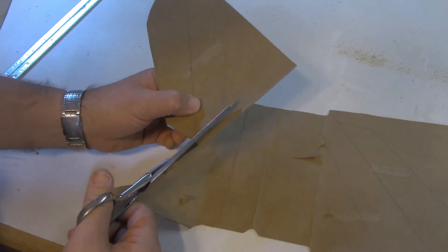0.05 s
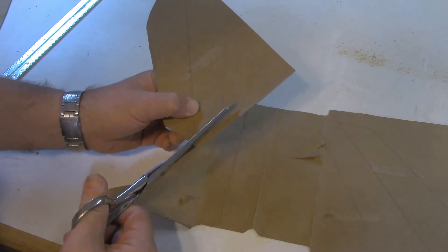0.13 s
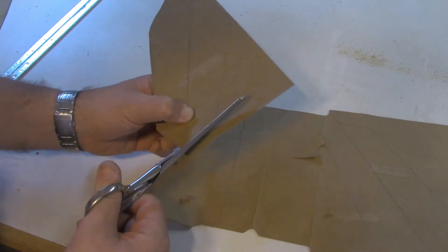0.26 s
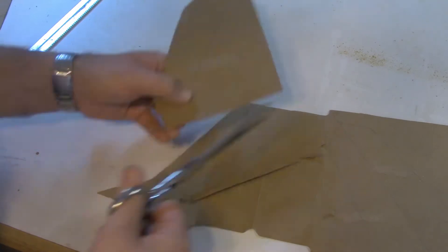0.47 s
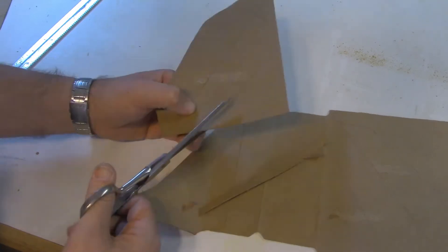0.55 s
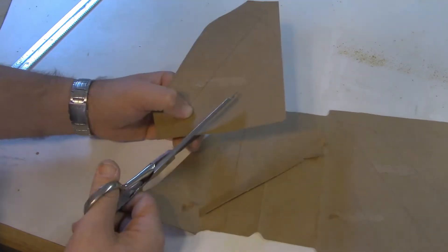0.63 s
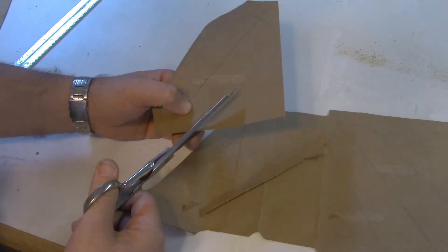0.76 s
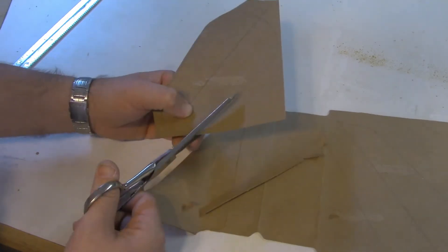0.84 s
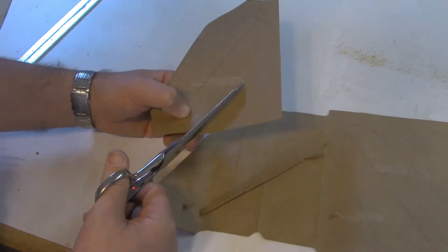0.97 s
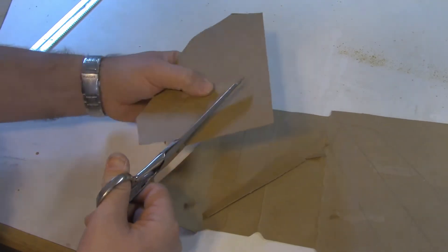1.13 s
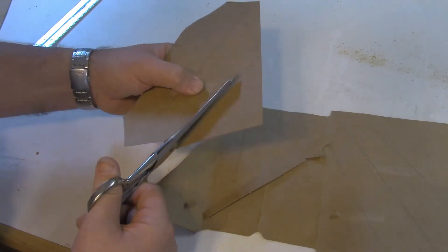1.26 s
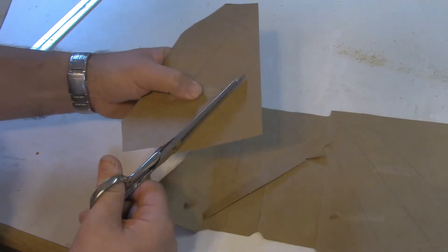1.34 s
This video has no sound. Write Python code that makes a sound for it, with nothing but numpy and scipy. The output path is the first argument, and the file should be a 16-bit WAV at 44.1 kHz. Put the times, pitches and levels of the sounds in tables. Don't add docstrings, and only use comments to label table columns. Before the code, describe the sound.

Scissors cutting thin cardboard, heard close on a small camera microphone. From 0 to 0.2 s the blades crunch and rasp through the card, then snap shut with a sharp, bright clack at about 0.22 s. Near quiet follows until 0.65 s, with faint ticks. Light card crackles lead into a second, softer cut from 1.0 to 1.4 s, gritty and uneven. Steady, quiet room hiss and a short table echo.

```python
import sys
import numpy as np
from scipy import signal
from scipy.fft import rfft, irfft
from scipy.io import wavfile
from scipy.ndimage import uniform_filter1d

SR = 44100
rng = np.random.default_rng(int(sys.argv[2]) if len(sys.argv) > 2 else 0)


def voltage_ratio(level):
    return 10 ** (np.asarray(level, float) / 20)


def master(y):
    cut = np.clip(np.atleast_2d(y).T, -1, 1)
    pcm = np.round(cut * 32767)
    wavfile.write(sys.argv[1], SR, pcm.astype(np.int16))


N = 61739

# pitch_hz, level_db (per Hz)
ROOM_SPECTRUM = [(15, -22), (32, 0.5), (100, -0.5), (240, -5.5), (600, -7), (3200, -17), (9000, -22),
                 (15500, -28.5)]
# middle_s, length_s, level_db, pitch_hz
CHATTER_FIRST_CUT = [(.008, 0.0069, -56, 3100), (.012, .012, -52, 2420), (.014, .005, -50.5, 3950),
                     (.017, 0.0057, -44.5, 2800), (.018, 0.0065, -51, 3510), (.069, .003, -51, 3500),
                     (.0905, 0.0025, -37, 1510), (.141, 0.0053, -55, 2600), (.2385, 0.0017, -35, 4530),
                     (.226, 0.0031, -32.5, 880), (.243, 0.011, -50.5, 404), (.085, 0.0034, -48, 3500),
                     (.088, 0.0032, -35.5, 1470), (.097, 0.006, -42.5, 1260), (.115, 0.0061, -48, 1150),
                     (.162, 0.0061, -44, 5500), (.165, 0.0082, -34, 1150), (.168, 0.0042, -42.5, 4880),
                     (.172, 0.0076, -43, 1020), (.2085, 0.0023, -36.5, 1080), (.218, 0.0026, -33, 1470),
                     (.2285, 0.0044, -28, 1050)]
CHATTER_SECOND_CUT = [(.693, 0.0056, -49.5, 4440), (.694, 0.0043, -50, 5240), (.836, 0.0063, -47, 4160),
                      (.837, .006, -55, 4960), (.837, 0.0075, -48.5, 1054), (1.266, .006, -54.5, 1950),
                      (1.386, 0.013, -55, 980), (1.033, .009, -53.5, 11020), (1.034, 0.0073, -42.5, 867),
                      (1.036, 0.0078, -39, 2650), (1.036, .008, -47.5, 5560), (1.037, .005, -53, 8800),
                      (1.039, 0.0059, -40.5, 1087), (1.050, .007, -44.5, 3440),
                      (1.052, 0.0065, -43.5, 2660), (1.051, 0.0055, -45, 1130), (1.052, .005, -58.5, 11100),
                      (1.135, 0.01, -54.5, 2630), (1.134, 0.0086, -59, 5340), (1.143, 0.0046, -47, 2530),
                      (1.143, 0.0065, -51.5, 11100), (1.143, 0.0059, -56, 9700), (1.145, .004, -39, 1320),
                      (1.149, 0.012, -48, 978), (1.159, 0.0018, -54, 1100), (1.231, 0.0042, -46.5, 2520),
                      (1.231, 0.0036, -42.5, 1670), (1.235, .006, -47.5, 830), (1.242, .004, -48, 1090),
                      (1.258, .003, -49, 1040), (1.2615, 0.0027, -50, 1040)]
# middle_s, length_s, crunch_db, crunch_hz, steel_ring_db
BITES_FIRST_CUT = [(0.012, 0.029, -56, 3160, -67.5), (0.06, 0.029, -51.5, 3230, -59),
                   (0.085, 0.0061, -46.5, 3400, -52), (0.097, 0.016, -46, 2750, -59),
                   (0.117, 0.034, -58, 1990, -67), (0.14, 0.016, -46, 2700, -68),
                   (.165, .011, -49, 2710, -50.5), (0.18, 0.011, -50, 3860, -60),
                   (0.195, 0.029, -53, 3560, -63.5), (0.211, 0.002, -48, 2980, -64),
                   (0.22, 0.008, -32, 4740, -47), (0.229, 0.0054, -38, 2480, -42),
                   (0.238, .014, -40.5, 4380, -55), (0.288, 0.058, -65, 3160, -76),
                   (0.326, 0.006, -58.5, 2050, -82), (0.356, 0.037, -60.5, 3170, -84),
                   (0.467, 0.0046, -57, 2980, -87), (0.481, 0.013, -62.5, 2400, -85)]
BITES_TURNING = [(0.664, 0.013, -64, 2080, -85), (0.677, 0.0077, -56, 4120, -81),
                 (0.693, 0.0098, -47.5, 4690, -64.5), (0.72, 0.018, -58, 2730, -72),
                 (0.733, 0.0079, -58, 4600, -76), (0.765, 0.058, -63.5, 3930, -74),
                 (0.809, 0.0093, -59.5, 4130, -81), (0.837, 0.012, -51.5, 2660, -60.5),
                 (0.851, 0.0052, -52, 4230, -66), (0.88, 0.039, -56, 1930, -71),
                 (0.918, 0.01, -56, 3040, -71), (0.944, 0.048, -62.5, 1850, -74)]
BITES_SECOND_CUT = [(1.015, 0.0068, -53.5, 4200, -76), (1.033, 0.012, -45, 3480, -54),
                    (1.05, 0.0085, -47.5, 3300, -55.5), (1.088, 0.033, -54.5, 3100, -77),
                    (1.133, 0.0076, -61, 2620, -63), (1.143, 0.0069, -51.5, 3580, -59),
                    (1.189, 0.04, -54.5, 3450, -71), (1.231, 0.0089, -48, 3470, -63.5),
                    (1.243, 0.0046, -56, 2460, -77), (1.259, 0.0086, -57, 1930, -67),
                    (1.274, 0.025, -60, 2740, -80), (1.303, 0.021, -48, 4770, -65),
                    (1.314, 0.016, -50.5, 5300, -78), (1.364, 0.0091, -61.5, 2250, -81),
                    (1.382, 0.023, -56, 1870, -77), (1.394, 0.0049, -45, 3660, -58.5)]
# pitch_hz, level_db, t60_s
BLADE_LOW_MODES = [(2050, 2, 0.018), (2600, 2.5, 0.059), (3120, -5, 0.0064), (4300, -12, 0.011),
                   (4700, 16, 0.007), (5560, 6, 0.035)]
BLADE_HIGH_MODES = [(8870, -8, 0.0063), (9770, 5, 0.011), (10980, 0, 0.01)]
# middle_s, length_s, level_db, resonance_hz
FLEX_FIRST_CUT = [(0.015, 0.014, -56, 1550), (0.056, 0.036, -54.5, 1404), (0.089, 0.014, -42, 1235),
                  (0.098, 0.011, -44.5, 1480), (0.107, 0.012, -54, 1120), (0.138, 0.024, -53, 1530),
                  (0.165, .012, -41, 1164), (0.176, .012, -56, 1150), (0.202, 0.023, -50.5, 683),
                  (0.2088, 0.0043, -42, 1020), (0.217, 0.0049, -33.5, 1545), (0.225, 0.01, -34.5, 937),
                  (0.242, 0.011, -55.5, 1110)]
FLEX_SECOND_CUT = [(0.663, 0.025, -64, 430), (0.677, 0.006, -75, 1260), (0.693, 0.0082, -58, 1090),
                   (0.722, 0.013, -66, 990), (0.734, 0.005, -56, 1230), (0.762, 0.038, -63, 1430),
                   (0.81, 0.0093, -71, 1820), (0.837, 0.012, -51, 1400), (0.85, 0.005, -61, 1050),
                   (0.881, 0.017, -55, 1440), (0.916, 0.0052, -49.5, 620), (0.945, 0.061, -60, 470),
                   (1.015, 0.0051, -49.5, 674), (1.034, 0.016, -48.5, 1750), (1.05, 0.01, -50, 1150),
                   (1.088, 0.03, -55, 1300), (1.134, 0.0067, -69, 1100), (1.146, 0.013, -48.5, 1285),
                   (1.189, 0.021, -59, 1270), (1.231, 0.0066, -52, 1400), (1.244, 0.006, -57, 1070),
                   (1.262, 0.0082, -51.5, 1060), (1.274, 0.01, -52.5, 970), (1.3, 0.034, -52, 1096),
                   (1.311, 0.012, -52, 1500), (1.365, 0.0091, -69, 890), (1.38, 0.021, -55.5, 1020),
                   (1.394, 0.0045, -53.5, 950)]
# pitch_hz, level_db, t60_s
CARD_PANEL_MODES = [(970, 0, 0.049), (1150, 2, 0.031), (1358, 18, 0.022), (1630, 1, 0.021)]
# pitch_hz, level_db, t60_s
SNAP_MODES = [(276, -32, 0.014), (501, -25, 0.029), (930, -23, 0.021), (2190, 3.5, 0.0073),
              (2935, -18.5, 0.019), (3445, -13.5, 0.012), (4130, -5.5, 0.0043), (5500, 0.5, 0.0075),
              (6580, -16, 0.0086), (8150, -10.5, 0.0054), (10150, 1.5, 0.0051), (11260, -2, 0.0055),
              (12700, -10, 0.0036), (14900, -9, 0.003)]

CLOSE_TOP_HZ = 15700


def unit(x):
    return x / np.sqrt(np.sum(x ** 2) + 1e-18)


def low_cut(x, hz, order=2):
    return signal.sosfilt(signal.butter(order, hz, "high", fs=SR, output="sos"), x)


def ring(modes, rise_s, size=2048):
    t = np.arange(size) / SR
    total = np.zeros(size)
    for k, (hz, db, t60_s) in enumerate(modes):
        decay = np.exp(-np.log(1000) * t / t60_s)
        total += (-1) ** k * voltage_ratio(db) * np.sin(2 * np.pi * hz * t) * decay
    return unit(total * (1 - np.exp(-t / rise_s)))


def fibres():
    fibres_per_s, spread_db = 14000, 2.5
    chance, size_draw, sign_draw = rng.random((3, N))
    size = voltage_ratio(-spread_db * np.log(1 - size_draw)) * np.sign(sign_draw - 0.5)
    silence = np.exp(np.clip((chance * SR / fibres_per_s - 1) * 20, -50, 50))
    return size / (1 + silence)


def add_burst(out, stream, middle_s, length_s, db, body):
    t = np.arange(N) / SR - middle_s - 0.018 * length_s
    width_s = length_s * np.where(t < 0, 0.36, 0.43 * 0.7)
    swell = np.exp(-0.5 * (t / width_s) ** 2)
    i = np.flatnonzero(swell > 1e-3)
    start, stop = i[0], i[-1] + 1
    burst = signal.fftconvolve((stream * swell)[start:stop], body)[:N - start]
    out[start:start + len(burst)] += unit(burst) * voltage_ratio(db) * np.sqrt(0.91 * length_s * SR)


def room():
    room_db, hiss_top_hz = -58.5, 15600
    whine_hz, whine_db = 12000, -85
    hz = np.fft.rfftfreq(N, 1 / SR) + 1
    curve_hz, curve_db = np.array(ROOM_SPECTRUM).T
    shape = voltage_ratio(np.interp(np.log(hz), np.log(curve_hz), curve_db))
    hiss = irfft(rfft(rng.standard_normal(N)) * shape * (hz < hiss_top_hz), N)
    whine = np.sqrt(2) * voltage_ratio(whine_db) * np.sin(2 * np.pi * whine_hz * np.arange(N) / SR)
    return unit(hiss) * np.sqrt(N) * voltage_ratio(room_db) + whine


def chatter():
    roughness, grip_s = 0.48, 0.0012
    t, out = np.arange(N) / SR, np.zeros(N)
    waver = uniform_filter1d(rng.standard_normal((2, N)), size=int(grip_s * SR) + 1, axis=1)
    grip = 1 + roughness * (waver[0] + 1j * waver[1]) / np.std(waver)
    for k, (middle_s, length_s, db, hz) in enumerate(CHATTER_FIRST_CUT + CHATTER_SECOND_CUT):
        i = np.flatnonzero(np.abs(t - middle_s) < 2 * length_s)
        since = t[i] - middle_s
        swell = np.exp(-0.5 * (since / (0.37 * length_s)) ** 2)
        burst = swell * np.imag(grip[i - 300 * k] * np.exp(2j * np.pi * hz * since))
        out[i] += voltage_ratio(db) * unit(burst) * np.sqrt(np.sum(swell ** 2))
    return out


def blades():
    rise_s, crunch_t60_s = 0.00017, 0.0056
    out, crunch_stream, steel_stream = np.zeros(N), fibres(), fibres()
    rasp_mid = voltage_ratio(6) * ring([(3430, 0, 0.00066)], rise_s)
    rasp_high = voltage_ratio(5) * ring([(9560, 0, 0.0007)], 1 / SR)
    low = voltage_ratio(-8) * ring(BLADE_LOW_MODES, rise_s) + rasp_mid
    high = ring(BLADE_HIGH_MODES, rise_s) + rasp_high
    for middle_s, length_s, db, hz, steel_db in BITES_FIRST_CUT + BITES_TURNING + BITES_SECOND_CUT:
        crunch = ring([(hz, 0, crunch_t60_s)], rise_s)
        add_burst(out, crunch_stream, middle_s, length_s, db, crunch + low)
        add_burst(out, steel_stream, middle_s, length_s, steel_db, high)
    return out


def card():
    rise_s, flex_t60_s = 0.00067, 0.014
    out, stream = np.zeros(N), fibres()
    rasp_low = voltage_ratio(-1.5) * ring([(1500, 0, 0.0024)], 1 / SR)
    panel = low_cut(voltage_ratio(-12) * ring(CARD_PANEL_MODES, rise_s) + rasp_low, 860, order=4)
    for middle_s, length_s, db, hz in FLEX_FIRST_CUT + FLEX_SECOND_CUT:
        flex = low_cut(ring([(hz, 0, flex_t60_s)], rise_s), 0.64 * hz)
        add_burst(out, stream, middle_s, length_s, db, flex + panel)
    return out


def snap():
    snap_s, rise_s, snap_db = 0.2226, 0.00078, -12.5
    crack_s, crack_db = 0.00057, -4.5
    t = np.arange(N) / SR
    blow = np.sinc((t - snap_s) * SR)
    rung = signal.fftconvolve(blow, ring(SNAP_MODES, rise_s))[:N]
    after = np.maximum(t - snap_s, 0) / crack_s
    crack = np.diff(rng.standard_normal(N + 1)) * after * np.exp(-after)
    return (rung + voltage_ratio(crack_db) * unit(crack)) * voltage_ratio(snap_db) * np.sqrt(0.0034 * SR)


def table_echo(near):
    echo_db, t60_s = -20, 0.068
    t = np.arange(8192) / SR
    tail = rng.standard_normal(8192) * np.exp(-np.log(1000) * t / t60_s) * (t > 0.002)
    tail = signal.lfilter([1], [1, -0.5], tail)
    tail = signal.sosfilt(signal.butter(8, CLOSE_TOP_HZ, fs=SR, output="sos"), tail)
    return voltage_ratio(echo_db) * signal.fftconvolve(near, unit(tail))[:N]


def scene():
    top_cut = signal.ellip(8, 0.2, 60, CLOSE_TOP_HZ, fs=SR, output="sos")
    cutting = signal.sosfilt(top_cut, chatter() + blades() + card())
    near = low_cut(cutting, 405) + low_cut(snap(), 160)
    return (room() + near + table_echo(near))[None]


def low_pass(x):
    return signal.sosfilt(signal.butter(12, 16820, fs=SR, output="sos"), x)


def record(dry):
    overload, top_hz = 0.75, 16500
    rounded = overload * np.tanh(dry / overload)
    mix = signal.sosfilt(signal.ellip(10, 0.2, 90, top_hz, fs=SR, output="sos"), rounded)
    return low_pass(mix)


dry = scene()
out = record(dry)
master(out)
```